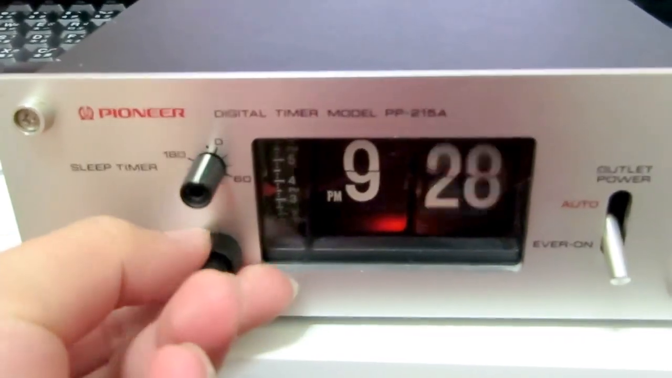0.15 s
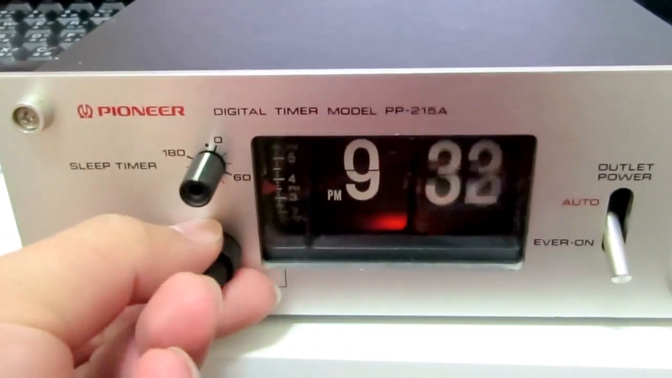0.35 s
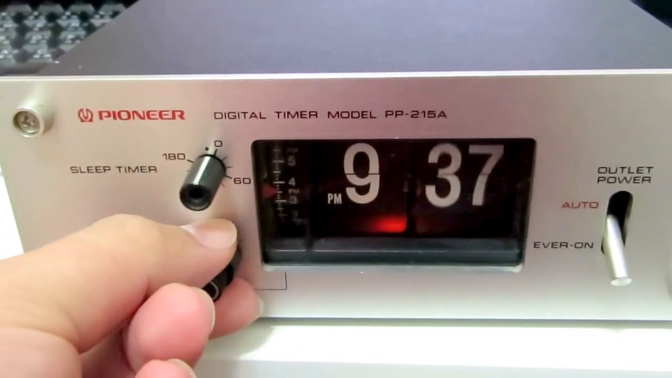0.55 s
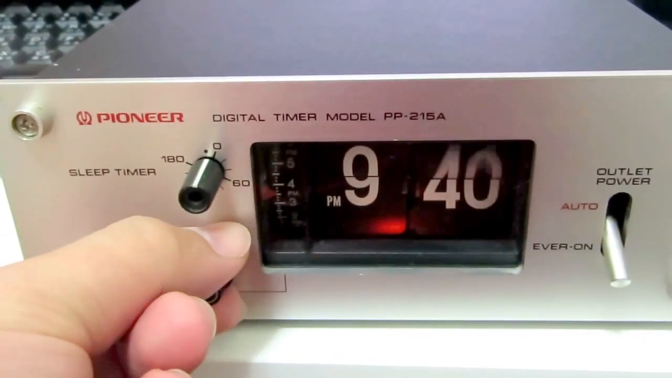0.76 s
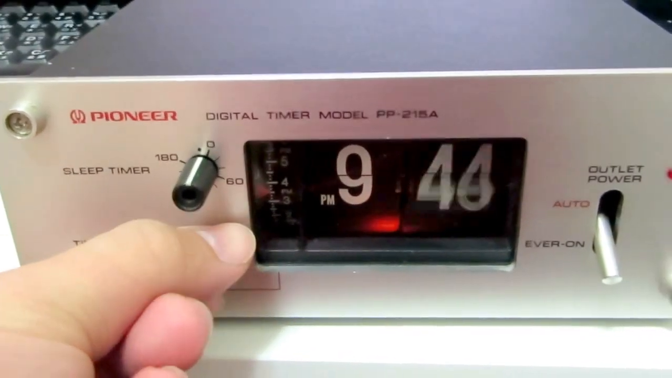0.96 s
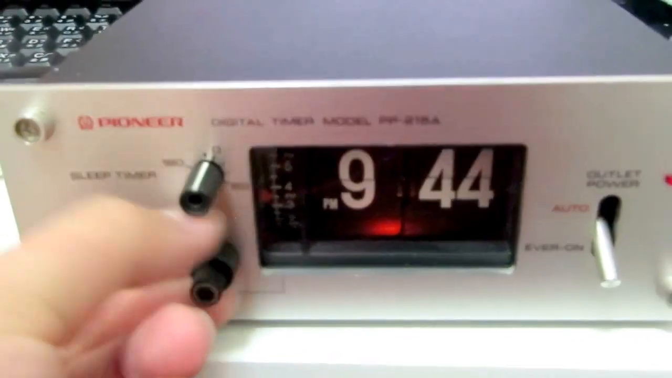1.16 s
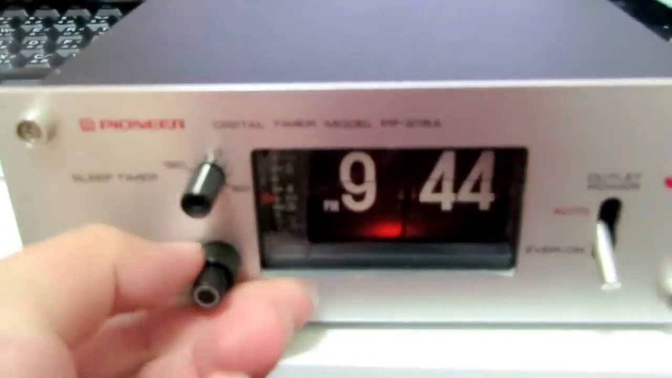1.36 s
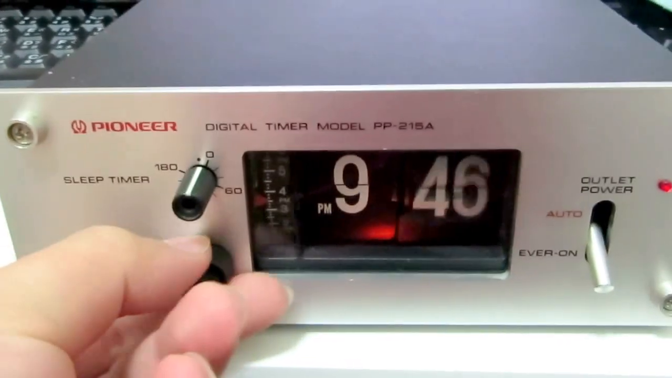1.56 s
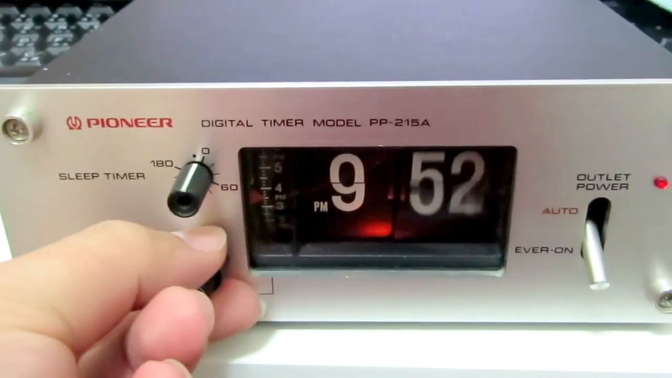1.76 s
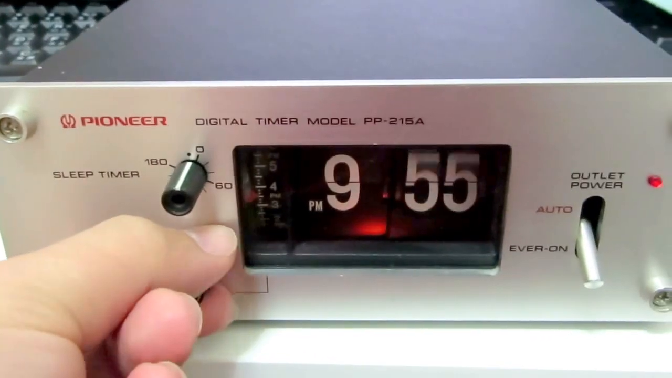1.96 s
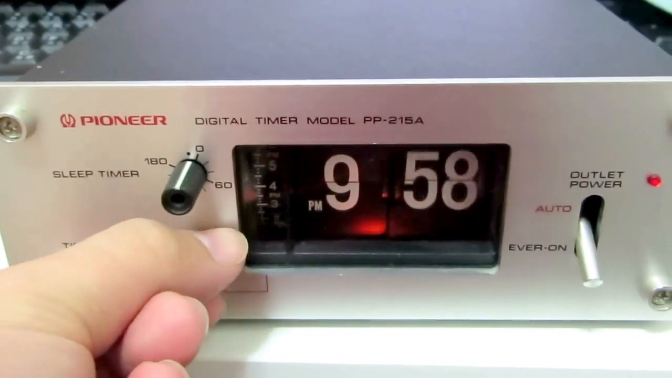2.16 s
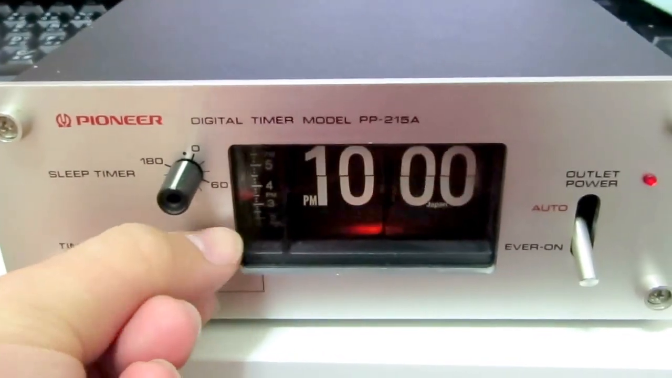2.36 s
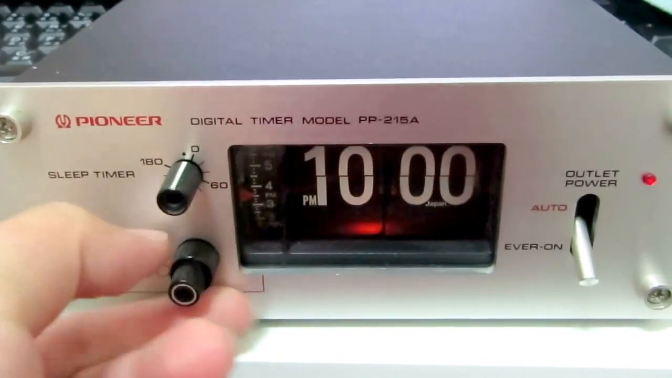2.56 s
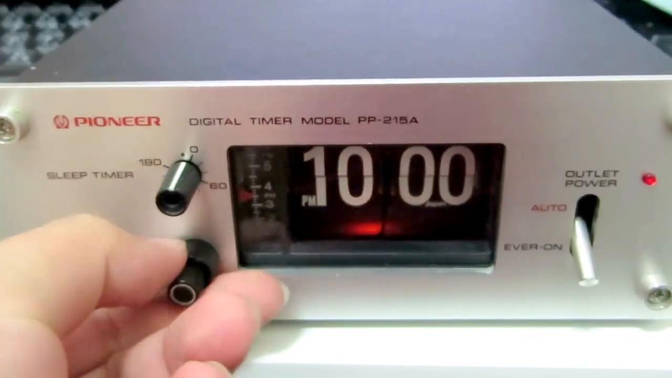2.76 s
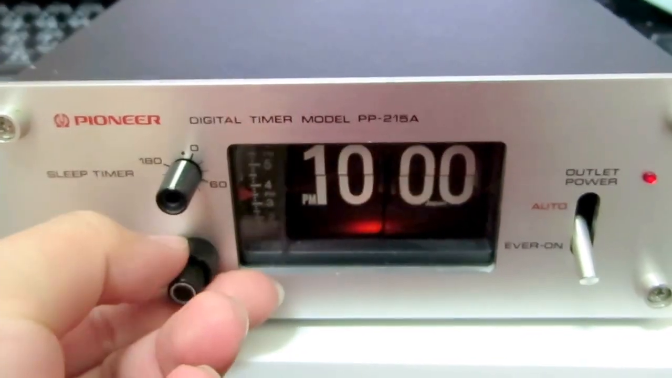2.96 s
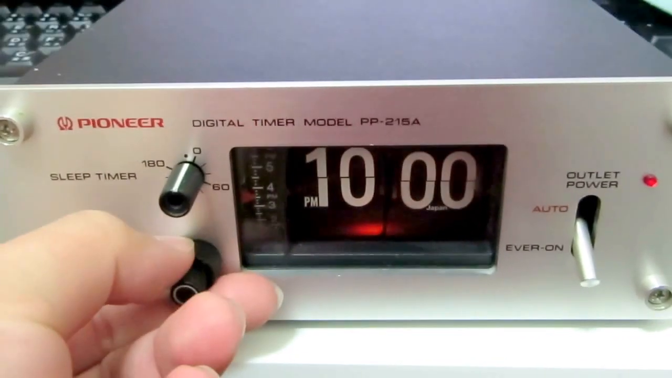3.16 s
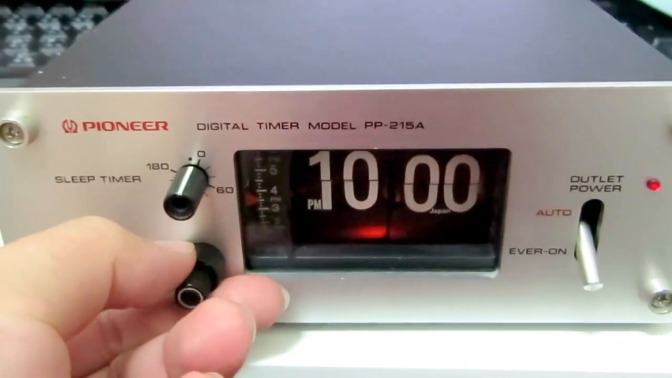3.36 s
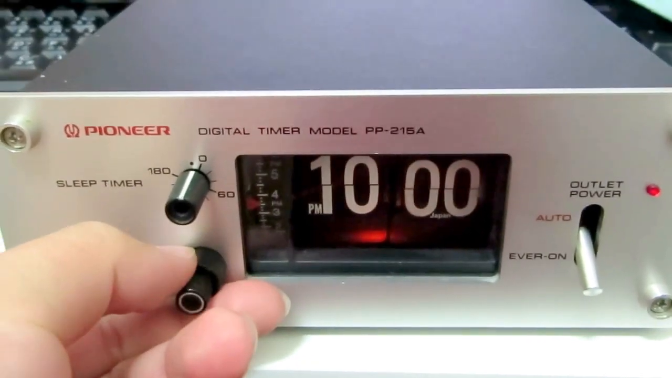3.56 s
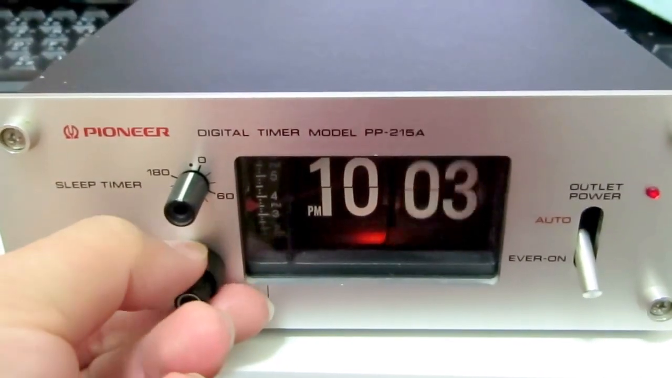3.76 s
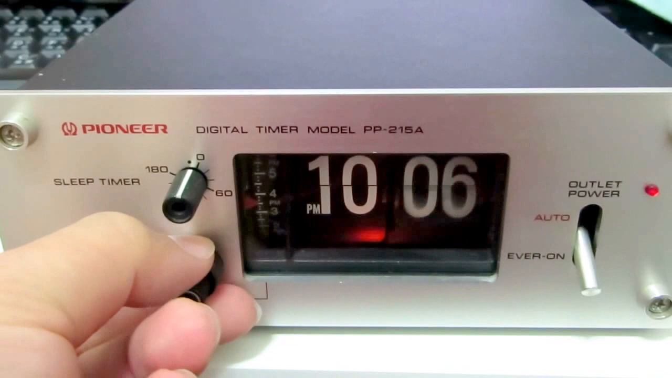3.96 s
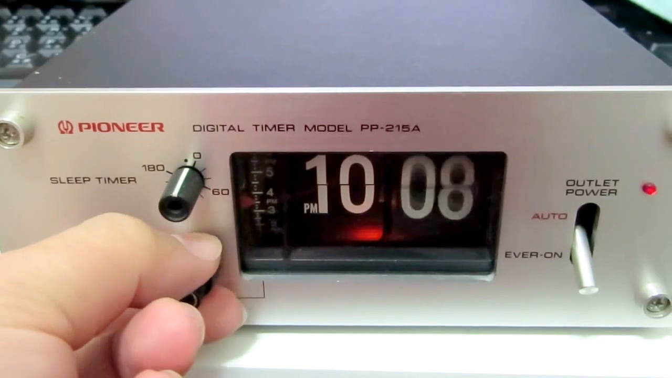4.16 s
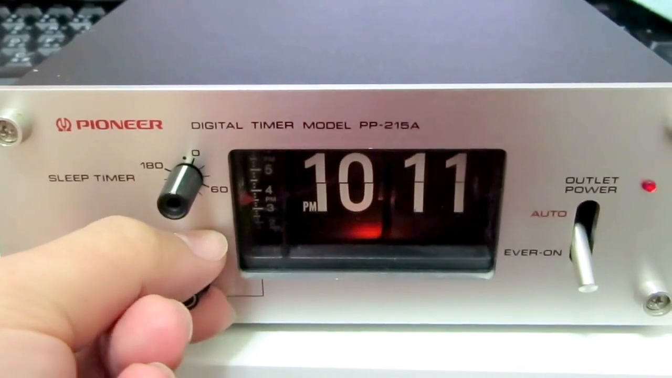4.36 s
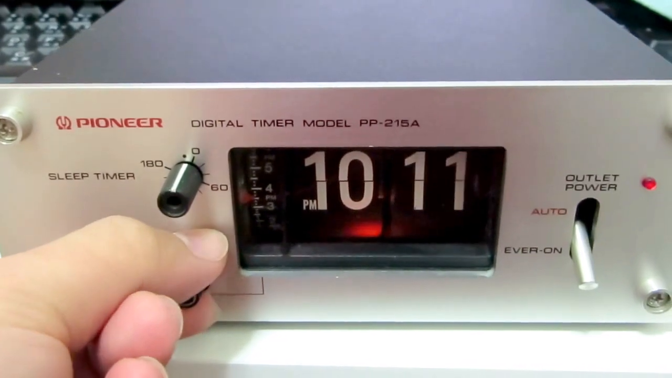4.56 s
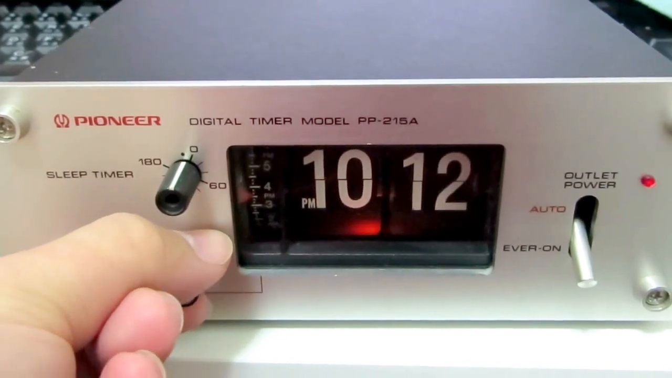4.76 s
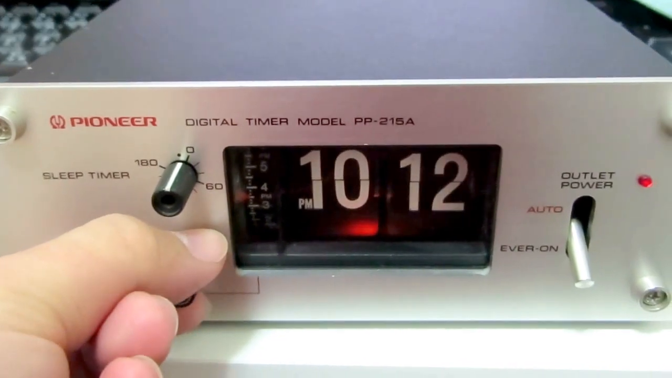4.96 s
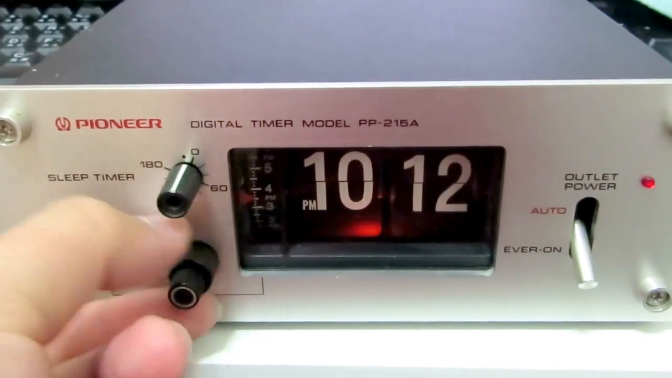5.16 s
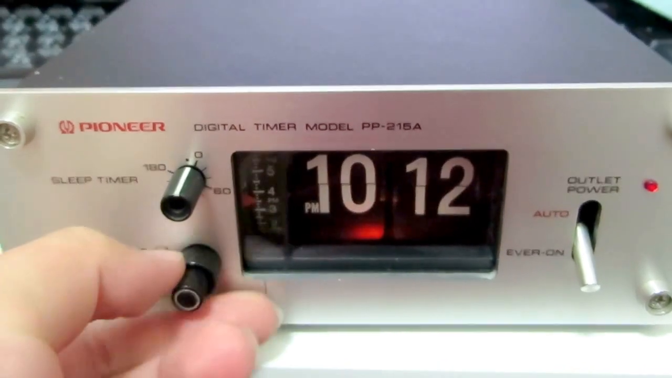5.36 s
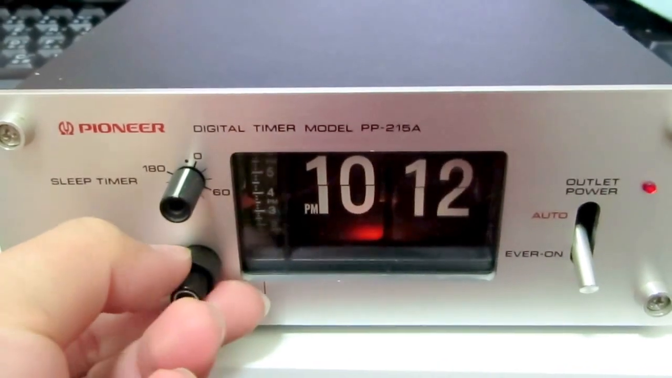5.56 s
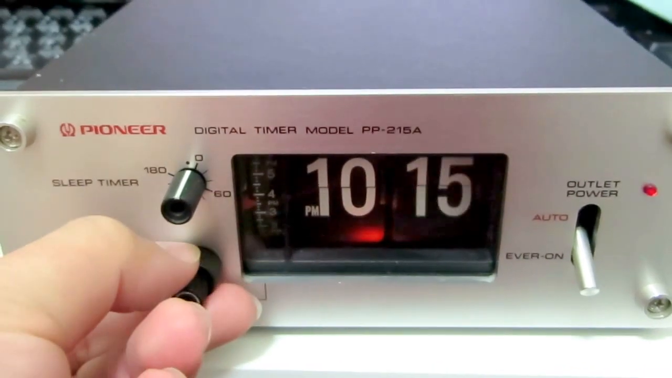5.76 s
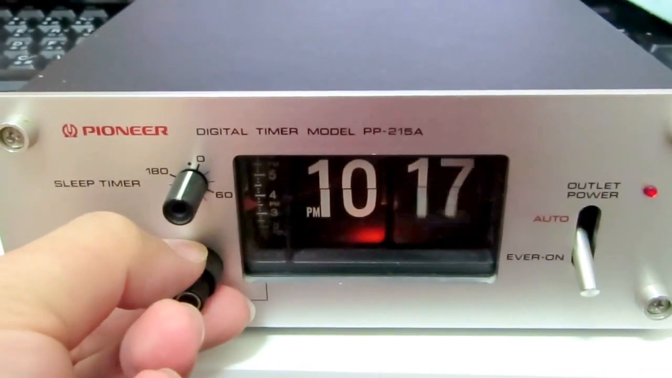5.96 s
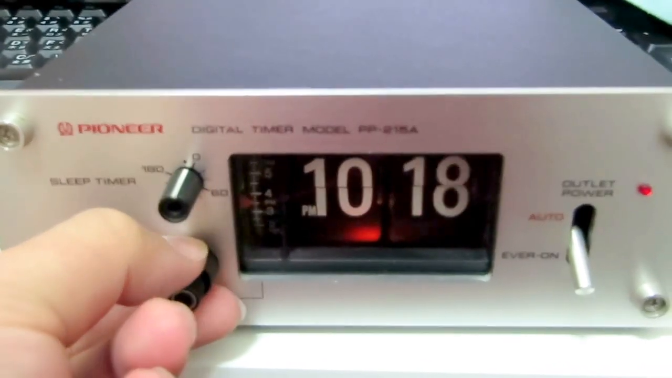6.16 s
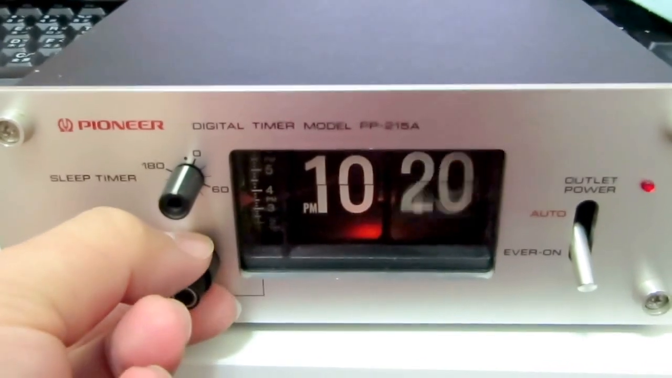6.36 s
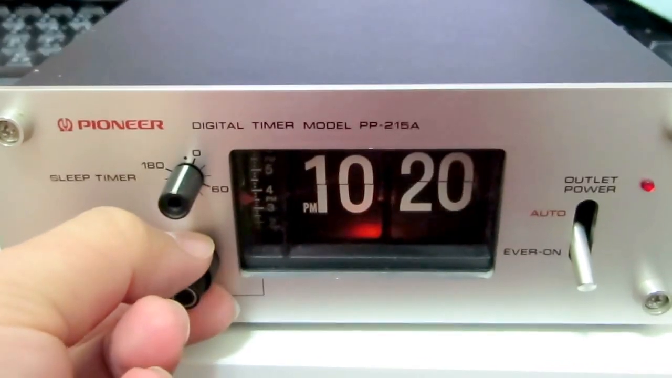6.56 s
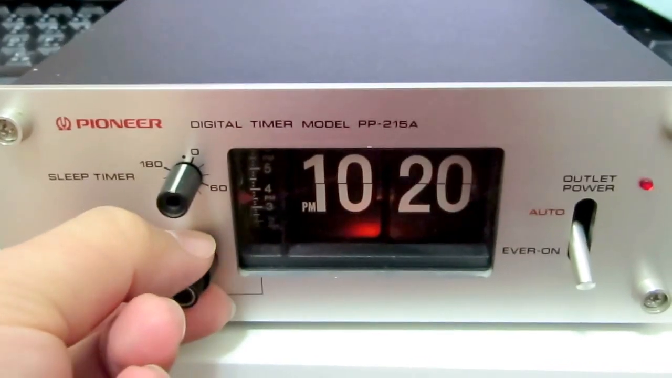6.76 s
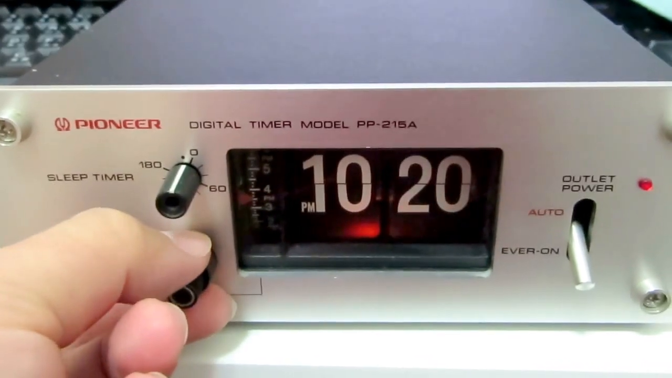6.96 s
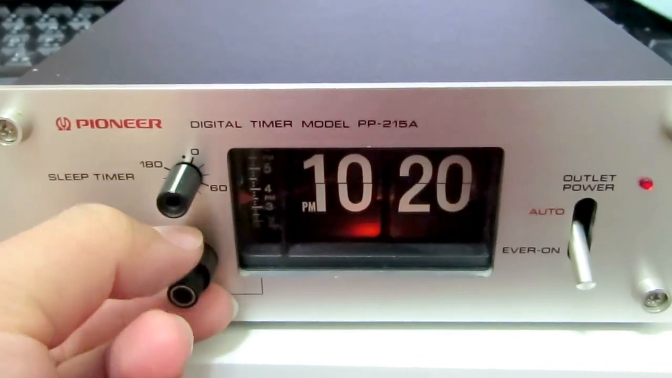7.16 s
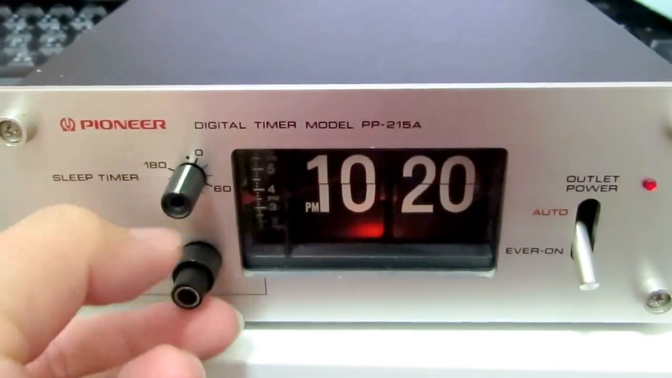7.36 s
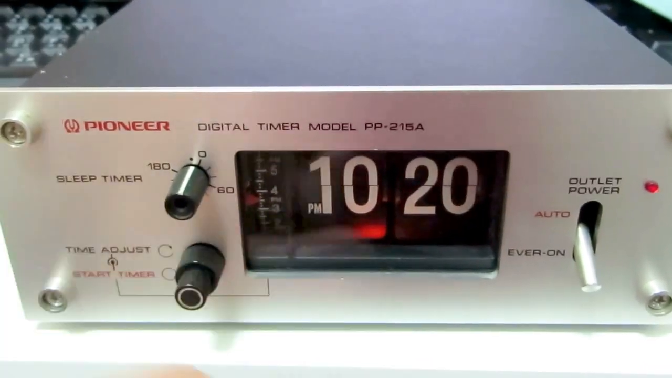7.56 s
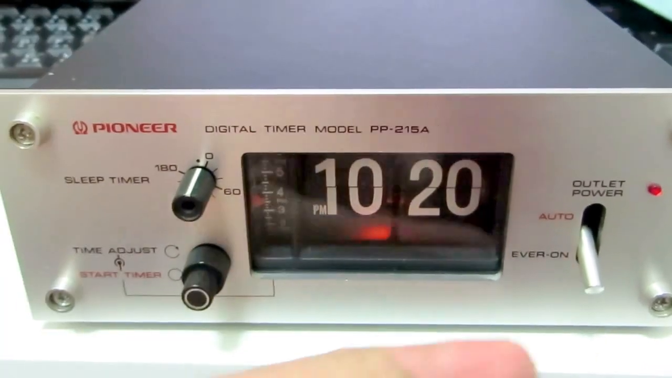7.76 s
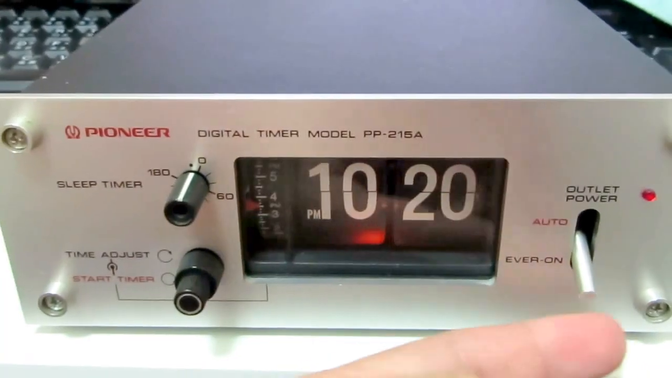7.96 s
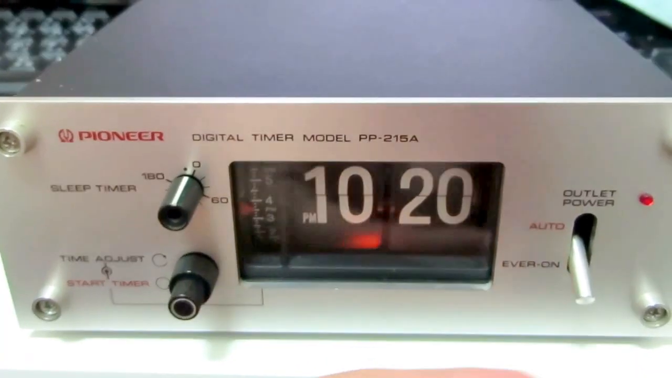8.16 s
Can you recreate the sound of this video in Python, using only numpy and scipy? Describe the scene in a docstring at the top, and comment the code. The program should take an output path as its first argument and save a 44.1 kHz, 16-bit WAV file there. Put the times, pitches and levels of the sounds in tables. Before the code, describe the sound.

Close bursts of sharp flip clock clicks, with soft finger ticks on the knob between them and low electrical hum.

```python
"""Fingertips tick on a knob over mains hum and room noise; then plastic flaps clack down in runs
as a hand sets a flip clock in a metal case, close to a stereo microphone. Each flap slips off its
catch, rattles on the stack for a few milliseconds and bounces once. The impact excites damped modes
of flap, drum, frame and case, and the stack rustles on. Between runs, skin and drum drag with friction."""
import sys
import numpy as np
from scipy import signal
from scipy.fft import rfft, irfft, next_fast_len
from scipy.io import wavfile
from scipy.ndimage import uniform_filter1d

SR = 44100
rng = np.random.default_rng(int(sys.argv[2]) if len(sys.argv) > 2 else 0)


def inscribe(sig):
    """Save sig as 16-bit PCM at rate SR to the path in sys.argv[1].

    A 1-D sig is mono; a 2-D sig holds one channel per row.
    Samples are clipped to [-1, 1] before scaling.
    """
    pcm = np.round(np.clip(np.atleast_2d(sig).T, -1, 1) * 32767)
    wavfile.write(sys.argv[1], SR, pcm.astype(np.int16))


N = 362061

# Noise spectra. Each row: frequency in Hz, relative spectral density in dB.
ROOM_SPECTRUM = [(20, -15.5), (28, -8), (41, -19), (55, -8), (223, -6.5), (301, -4), (546, -8.5),
                 (797, -13.5), (1750, -17), (2930, -20.5), (8430, -29.5), (12200, -41.5), (13300, -48)]
DRAG_SPECTRUM = [(150, -42), (400, -4), (800, -5.5), (1300, -12), (2000, -13.5), (5170, -26.5),
                 (10200, -29), (14000, -50)]
RUSTLE_SPECTRUM = [(150, -52), (250, -7.5), (1000, -9.5), (2500, 0.5), (4450, -4.5), (8600, -1),
                   (12200, -6), (13400, -23)]
# Likeness of the two channels. Each row: frequency in Hz, correlation from 0 to 1.
ROOM_COHERENCE = [(25, .98), (60, 0.75), (180, 0.064), (550, 0.027), (1650, 0.62), (4970, 0.75),
                  (15000, 0.045)]
CLOCK_COHERENCE = [(500, 0.77), (2000, 1), (5000, 1), (12000, 0.088)]
# Mains and motor tones. Each row: frequency in Hz, level in dB, waver width in Hz, steady-to-waver ratio.
HUM_LINES = [(120, -54, 9, 1.1), (258, -55, 14, .3), (303, -54, 25, .3), (360, -58, 6, .8),
             (394, -60, 6, .8), (1534, -66, 4, 1.5), (1573, -65, 4, 1.5), (2046, -67, 4, 1.5),
             (3003, -65, 4, 2)]
# Drift of the lowest hum line. Each row: time in seconds, gain in dB.
MAINS_DRIFT = [(0, -1), (2.7, 2), (3.8, -2), (5.8, 4), (6.9, 0.5), (7.1, -12), (8.2, -2.5)]
# Friction envelopes, one list a stroke. Each row: time in seconds, level in dB.
DRAG_STROKES = [
    [(1.325, -46), (1.337, -32.5), (1.36, -43), (1.4, -51)],
    [(3.225, -61), (3.24, -39), (3.265, -34), (3.3, -38.5), (3.35, -42)],
    [(3.81, -66), (3.835, -37.5), (3.875, -33.5)],
]
# Fingers grip and leave the knob. Each row: start in seconds, level in dB, gain of the dull modes in dB.
KNOB_TOUCHES = [(0.077, -39, 6.5), (.225, -41, 3), (.263, -38, -8), (0.238, -26.5, -8), (1.2957, -25, -3),
                (1.3048, -28, 1), (1.5296, -40, 8), (1.5886, -29, 9.5), (1.628, -32, 1), (2.3958, -20, -14),
                (2.6496, -33.5, -5), (2.813, -32.5, 4.5), (2.9301, -28.5, -6), (5.366, -26.5, -6.5),
                (5.522, -27, -1.5), (5.6328, -30, -4.5), (7.431, -46, 11)]
# The hand nudges the case. Each row: start in seconds, peak in dB.
CASE_NUDGES = [(.345, -34.5), (.52, -41.5), (0.824, -34.5), (1.325, -36.5), (3.89, -35.5), (3.99, -38),
               (4.165, -34.5), (4.345, -34), (5.775, -39), (6.375, -35)]
# Normal modes. Each row: frequency in Hz, relative level in dB, time to decay 60 dB in seconds.
CASE_MODES = [(261.2, -26.5, 0.25), (522.4, 0.5, 0.029), (590.4, -2, 0.061), (906, -18, 0.19),
              (1277, 4, 0.05), (1419, -10, 0.13), (1550, -20, 0.016)]
DRUM_MODES = [(1920, -12, .03), (2070, -9, .04), (2230, 0, .016), (2500, -12, .04), (2950, -5, .012)]
FRAME_MODES = [(3400, -4, .01), (3950, 0, .018), (4150, -6, .015)]
FLAP_MODES = [(5150, -2.5, 0.0053), (5700, -1.5, 0.0094), (6490, 4.5, 0.0064), (7230, 0.5, 0.0036),
              (7970, 4, 0.0098), (8590, 2, 0.0095), (9530, 4, 0.0027), (10240, 1, 0.0093),
              (11900, -2, 0.0076), (12400, -3, 0.0026), (12480, -13, 0.01), (14030, -11, 0.0099)]
# Decay of the rustle in case and room. Each row: frequency in Hz, time to decay 60 dB in seconds.
RUSTLE_DECAY = [(300, 0.84), (1500, 0.37), (4600, 0.26), (12000, 0.25)]
# Falling flaps. Each row: start in seconds, flap peak in dB, case peak in dB,
# landing from 0 (against the frame) to 1 (on the drum).
FLAP_FALLS = [(0.3214, -2.5, -19, 0.6), (0.3438, -3.5, -22.5, 0.39), (0.3748, -5, -17.5, 0.79),
              (0.4502, -1, -24, 0.12), (0.5124, -3, -18.5, 0.9), (0.5443, -4.5, -25, 0.34),
              (0.6036, -3, -15, 1), (0.65, -2.5, -23.5, 0.62), (0.7, -6, -17, 0.94),
              (0.7567, -6.5, -22, 0.52), (0.8204, -7, -15.5, 0.76), (0.863, -8, -25.5, 0.78),
              (0.9268, -5.5, -30, 0.6), (1.0171, -6.5, -20, 0.36), (1.0629, -2, -21.5, 0.89),
              (1.1171, -7.5, -25, 0.69), (1.6923, -3, -20.5, 0.58), (1.7242, -2.5, -16, 0.22),
              (1.7448, -3, -24, 0.9), (1.7666, -3, -18, 0.4), (1.7926, -6.5, -19, 0.69),
              (1.8252, -6, -22, 0.43), (1.8507, -7, -30, 0.79), (1.916, -2, -18.5, 0.27),
              (1.946, -3.5, -22.5, 0.89), (1.9877, -3.5, -19, 0.3), (2.024, -4.5, -32, 0.6),
              (2.1319, -8, -25.5, 0.47), (2.1909, -2.5, -26, 0.83), (2.274, -10, -22.5, 0.46),
              (2.3327, -3, -23.5, 0.35), (2.4243, -8, -23, 0.12), (2.4667, -3.5, -29, 0.034),
              (3.296, -6, -23.5, 0.35), (3.8721, -9, -22.5, 0.57), (3.9, -3.5, -22, 0.99),
              (3.943, -5.5, -26, 0.16), (3.9829, -4, -22, 0.71), (4.1106, -5.5, -25.5, 0.019),
              (4.1517, -2.5, -20.5, 0.52), (4.2378, -2.5, -22, 0), (4.3044, -2.5, -19, 0.56),
              (4.35, -26, -25, 0.0), (4.37, -0.5, -22, 0), (4.4486, -3, -17.5, 0.61),
              (4.791, -2, -23.5, 0.33), (4.9031, -1, -16.5, 0.66), (5.773, -1, -24, 0.26),
              (5.8885, -2, -18, 0.69), (5.985, -3, -25, 0.27), (6.0613, -3.5, -17, 0.75),
              (6.2116, -4, -24.5, 0.69), (6.364, -6, -16, 0.93), (6.488, -5.5, -34, 0.72),
              (6.8255, -5.5, -21.5, 0.75)]
# Resonances in the rustle. Each row: frequency in Hz, gain in dB at landing 0, gain in dB at landing 1.
LINGERING_MODES = [(2286, 2, 2.5), (5790, 5, 4), (6600, 10, -1), (8580, 8, -0.5), (10100, 5, 0)]
# Ringing from turn to turn. Each row: time in seconds, then gains in dB of drum, frame and thin ring.
RING_GAINS = [(.5, -5.5, -4.5, 7), (.7, 2.5, 5, -0.5), (1.8, 0, 5.5, 1.5), (2.4, 4.5, -3.5, -0.5),
              (3.9, -2, -6, 1.5), (4.4, -10, -17, 8.5), (5.9, 4, -3, 9), (6.2, 2, -6, -2)]
# The two lines of a thin, high ring. Each entry: frequency in Hz.
THIN_RING_HZ = [5700, 10250]
# Stereo placement of case, drum, frame and flap. Each entry: left over right in dB.
PART_BALANCE = [0.47, .3, -0.00015, -1.2]
# Microphone response. Each row: frequency in Hz, gain in dB.
MIC_RESPONSE = [(11500, -0.5), (13500, -6), (14500, -9), (16500, -26)]

DRUM_DB, FRAME_DB, RUSTLE_DB = (-25.5, -10), (-11, -33.5), (-32, -28.5)  # base levels at landing 0 and 1
FOLLOW = 0.22  # share of a flap's dB level that drum, frame and rustle follow
FOCUS_HZ, FOCUS_SPREAD = 8300, 0.015  # centre of the flap's middle modes, relative scatter
OFF_FOCUS_DB = (-10, -1)  # gain of modes far from that centre, at landing 0 and 1
DETUNE, SCATTER_DB = 0.004, 1.2  # spread of mode pitch and level from blow to blow
BOUNCE_DB, LEAD_S = -14.5, 0.0008  # bounce against first push; head start of a rattle


def amp(db):
    return 10 ** (np.asarray(db) / 20)


def unit_rms(x):
    return x / np.sqrt(np.mean(x ** 2) + 1e-20)


def curve_at(points, hz):
    f, value = np.transpose(points)
    return np.interp(np.log(hz + 1), np.log(f + 1), value)


def add(mix, start_s, sound):
    part = mix[:, round(start_s * SR):][:, :sound.shape[1]]
    part += sound[:, :part.shape[1]]


def stereo_noise(spectrum, coherence, size):
    """Partial coherence: the right channel mixes the left one's coloured noise with noise of its own."""
    hz = np.fft.rfftfreq(size, 1 / SR)
    left, own = rfft(rng.standard_normal((2, size)))
    shared = np.clip(curve_at(coherence, hz), -1, 1)
    right = shared * left + np.sqrt(1 - shared ** 2) * own
    return unit_rms(irfft(np.array([left, right]) * amp(curve_at(spectrum, hz)), size))


def room_noise():
    """Stationary noise with its power mostly at low frequencies."""
    return amp(-42) * stereo_noise(ROOM_SPECTRUM, ROOM_COHERENCE, next_fast_len(N))[:, :N]


def hum():
    """Narrow-band modulation: each mains or motor tone is a steady phasor plus a slow random one."""
    t, out = np.arange(N) / SR, np.zeros((2, N))
    hop = 64
    for hz, db, width_hz, steady in HUM_LINES:
        lowpass = [1, -np.exp(-np.pi * width_hz * hop / SR)]
        real, imag = rng.standard_normal((2, 3, N // hop + 2))
        waver = signal.lfilter([1], lowpass, signal.lfilter([1], lowpass, real + 1j * imag))
        phasor = steady + (waver[0] + 0.27 * waver[1:]) / np.std(waver)
        tone = (np.repeat(phasor, hop, axis=1)[:, :N] * np.exp(2j * np.pi * hz * t)).real
        if hz == HUM_LINES[0][0]:
            db = db + np.interp(t, *np.transpose(MAINS_DRIFT))
        out += amp(db) * unit_rms(tone)
    return out


def drag():
    """Sliding friction of skin on knob and drum on catch gives short swells of grainy noise."""
    out = np.zeros((2, N))
    for stroke in DRAG_STROKES:
        times, db = np.transpose(stroke)
        t = np.arange(times[0], times[-1], 1 / SR)
        grain = amp(unit_rms(uniform_filter1d(rng.standard_normal(len(t)), 90)))
        friction = unit_rms(grain * stereo_noise(DRAG_SPECTRUM, CLOCK_COHERENCE, len(t)))
        add(out, times[0], amp(np.interp(t, times, db)) * friction)
    return out


def rattle(decay_ms, rise_ms=1.3):
    """Shot noise: the force of many tiny random contacts swells fast and dies away."""
    ms = np.arange(882) / SR * 1000
    contacts = (rng.random(len(ms)) < 0.12) * rng.standard_normal(len(ms))
    return contacts * (1 - np.exp(-(ms / rise_ms) ** 2)) * np.exp(-(ms / decay_ms) ** 2)


def ring(modes, force, gain_db=0, swell_s=1e-4, damping=1):
    """Modal superposition: damped sinusoids are convolved with the force and scaled to peak 1."""
    hz, db, t60 = np.array(modes).T[:, :, None]
    t = np.arange(3072) / SR
    shift, lag, scatter, phase = rng.standard_normal((4, len(modes), 1))
    # Offsetting the force's spectrum gives a mode nearly the same share of every rattle.
    share = abs(rfft(force, 2048))[np.round(hz * 2048 / SR).astype(int)] / np.linalg.norm(force)
    db = db - 0.9 * 20 * np.log10(share + 0.13) + gain_db + SCATTER_DB * scatter
    # Each mode leaves the case at its own angle, so the channels differ in the treble.
    lag_s = 4e-6 * lag * np.array([1, -1])[:, None, None]
    cycles = phase + hz * (1 + DETUNE * shift) * (t + lag_s)
    tones = amp(db - 60 * damping * t / t60) * np.sin(2 * np.pi * cycles)
    response = tones.sum(1) * (1 - np.exp(-(t / swell_s) ** 2))
    out = signal.fftconvolve(response, force[None], axes=1)[:, :len(t)]
    out *= np.minimum(4 * (1 - t / t[-1]), 1)  # fade the last quarter
    return out / abs(out).max()


def stack_rustle(landing, thin_db=0):
    """Reverberant decay: the stack settles, and its noise dies in case and room band by band."""
    hz, t, bands = signal.stft(stereo_noise(RUSTLE_SPECTRUM, CLOCK_COHERENCE, 10240), SR, nperseg=256)
    # The rustle keeps a few modes alive, other ones each time.
    mode_hz = np.array(CASE_MODES + DRUM_MODES + FRAME_MODES + FLAP_MODES)[:, :1]
    alive_db = 6 * rng.random((len(mode_hz), 1)) ** 4 * np.exp(-((hz - mode_hz) / 160) ** 2)
    linger_db = sum((a + (b - a) * landing) * np.exp(-((hz - f) / 140) ** 2)
                    for f, a, b in LINGERING_MODES)
    linger_db += thin_db * np.exp(-((hz[:, None] - THIN_RING_HZ) / 200) ** 2).sum(1)
    resonance_db = (alive_db.sum(0) + linger_db)[:, None]
    flicker_db = 0.75 * rng.standard_normal(len(t))
    decay_db = -60 * t / curve_at(RUSTLE_DECAY, hz)[:, None]
    tail = signal.istft(bands * amp(flicker_db + resonance_db + decay_db), SR, nperseg=256)[1]
    t = np.arange(tail.shape[1]) / SR
    # The stack settles once more with a faint tick.
    late_tick = 1.6 * rng.random() ** 2 * np.exp(-((t - rng.uniform(0.0662, 0.0938)) / 0.0033) ** 2)
    onset = 1 - np.exp(-(t / 0.0022) ** 2)
    return tail * onset * (1 + 5.32 * np.exp(-t / 0.0052) + late_tick)


def fingers():
    """Structure-borne sound: touches, damped by skin, cross the shaft; nudges ring the lowest mode."""
    out = np.zeros((2, N))
    for start_s, db, dull_db in KNOB_TOUCHES:
        force = rattle(decay_ms=4.6)
        bright = ring(FLAP_MODES + FRAME_MODES, force, damping=1.9)
        dull = ring(DRUM_MODES[:4] + CASE_MODES[4:5], force, gain_db=[[0], [0], [0], [0], [-12]])
        add(out, start_s - LEAD_S, amp(db) * (bright + amp(dull_db) * dull))
        add(out, start_s, amp(db - 28) * stack_rustle(landing=0.54))
    for start_s, db in CASE_NUDGES:
        add(out, start_s, amp(db) * ring(CASE_MODES[:1], np.ones(1), swell_s=0.0087))
    return out


def flap(flap_db, case_db, landing, drum_gain_db, frame_gain_db, thin_db):
    """Impact excitation: the point of landing divides the blow between frame and drum."""
    rattle_ms, bounce_s = rng.uniform([2.6, 0.019], [4.6, 0.026])
    focus_hz = FOCUS_HZ * (1 + FOCUS_SPREAD * rng.standard_normal())
    drum_db, frame_db, rustle_db = (FOLLOW * flap_db + np.interp(landing, [0, 1], ends)
                                    for ends in (DRUM_DB, FRAME_DB, RUSTLE_DB))
    thin_db = thin_db * np.clip((landing - 0.35) / 0.25, 0, 1)  # only drum landings wake the thin ring
    # Heavier parts feel the rattle as one push and the bounce as a second.
    push = np.zeros(round(bounce_s * SR) + 1)
    push[[30, -1]] = 1, amp(BOUNCE_DB)
    mode_hz = np.array(FLAP_MODES)[:, :1]
    off_focus = 1 - np.exp(-(np.log2(mode_hz / focus_hz) / 0.35) ** 2)
    mode_db = np.interp(landing, [0, 1], OFF_FOCUS_DB) * off_focus
    mode_db += thin_db * (abs(mode_hz - THIN_RING_HZ) < 700).any(1, keepdims=True)
    case_pan, drum_pan, frame_pan, flap_pan = amp(np.multiply.outer(PART_BALANCE, [[0.5], [-0.5]]))
    sound = amp(rustle_db) * stack_rustle(landing, thin_db)
    add(sound, 0, flap_pan * amp(flap_db) * ring(FLAP_MODES, rattle(rattle_ms), mode_db))
    add(sound, 0, case_pan * amp(case_db) * ring(CASE_MODES, push, swell_s=0.0027))
    add(sound, 0, drum_pan * amp(drum_db + drum_gain_db) * ring(DRUM_MODES, push, swell_s=0.00031))
    add(sound, 0, frame_pan * amp(frame_db + frame_gain_db) * ring(FRAME_MODES, push, swell_s=0.00092))
    return sound


def falling_flaps():
    """A train of impacts whose ringing varies from one turn of the knob to the next."""
    out = np.zeros((2, N))
    times, *gain_curves = np.transpose(RING_GAINS)
    for start_s, *fall in FLAP_FALLS:
        gains_db = [np.interp(start_s, times, curve) for curve in gain_curves]
        add(out, start_s - LEAD_S, flap(*fall, *gains_db))
    return out


def scene():
    """Linear superposition: the pressures of all sources add."""
    return falling_flaps() + fingers() + drag() + room_noise() + hum()


def record(dry):
    """Soft saturation rounds the peaks; microphone roll-off and a band limit cut the top octave."""
    size = next_fast_len(N)
    rounded = 1.4 * np.tanh(dry / 1.4)
    mic_gain = amp(curve_at(MIC_RESPONSE, np.fft.rfftfreq(size, 1 / SR)))
    heard = irfft(rfft(rounded, size) * mic_gain, size)[:, :N]
    band_limit = signal.firwin(511, cutoff=16700, window=("kaiser", 9), fs=SR)
    return signal.oaconvolve(heard, band_limit[None], "same")


dry = scene()
out = record(dry)
inscribe(out)
```